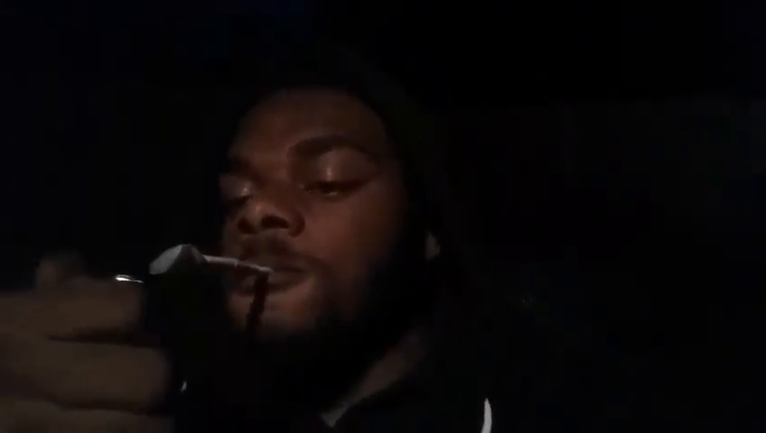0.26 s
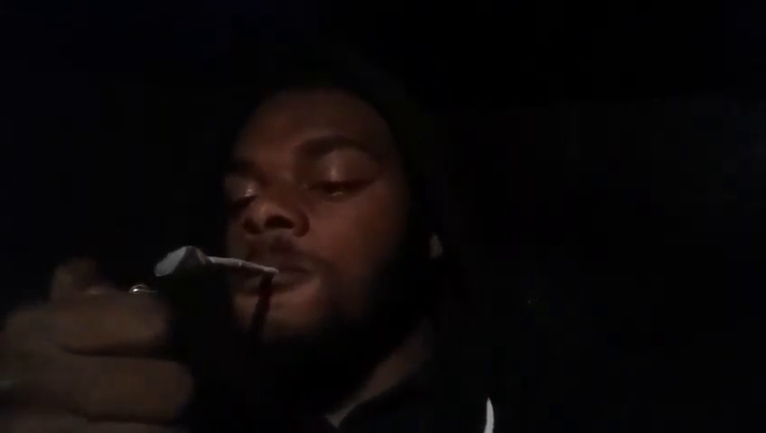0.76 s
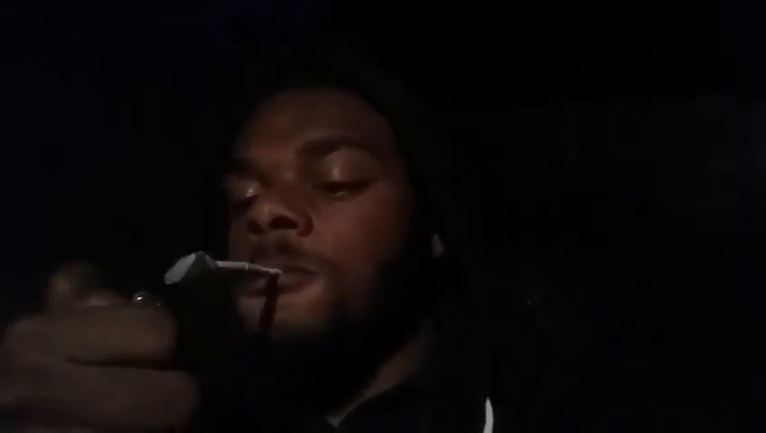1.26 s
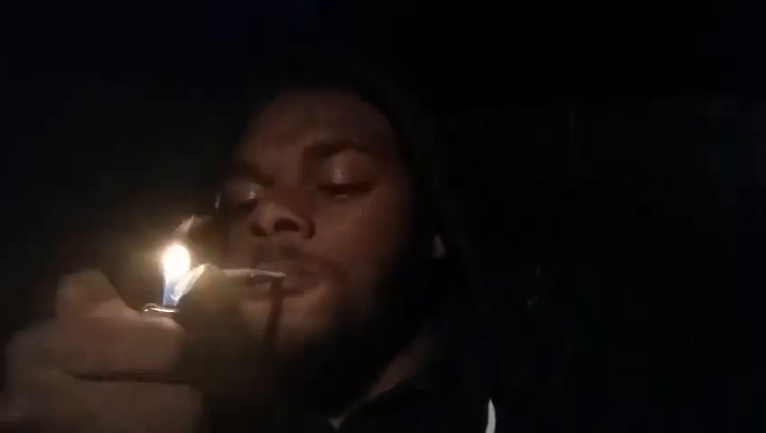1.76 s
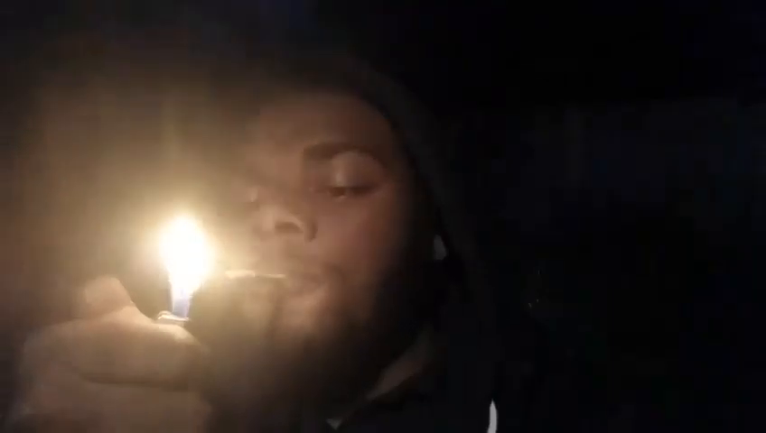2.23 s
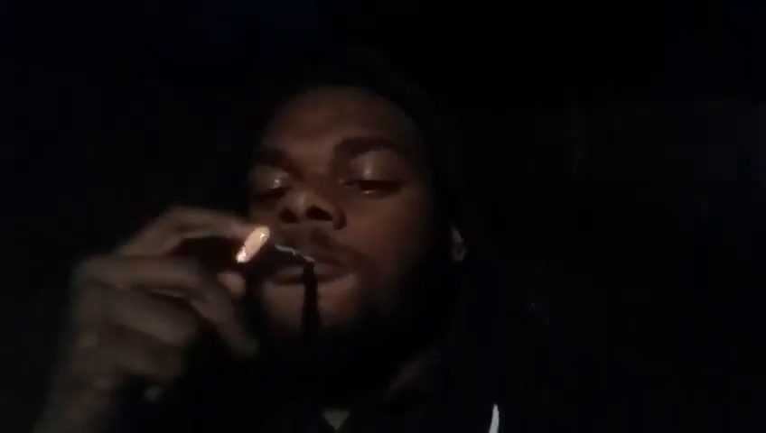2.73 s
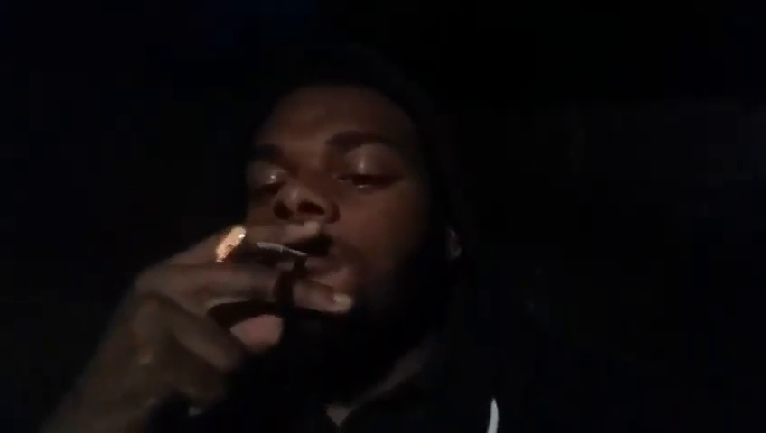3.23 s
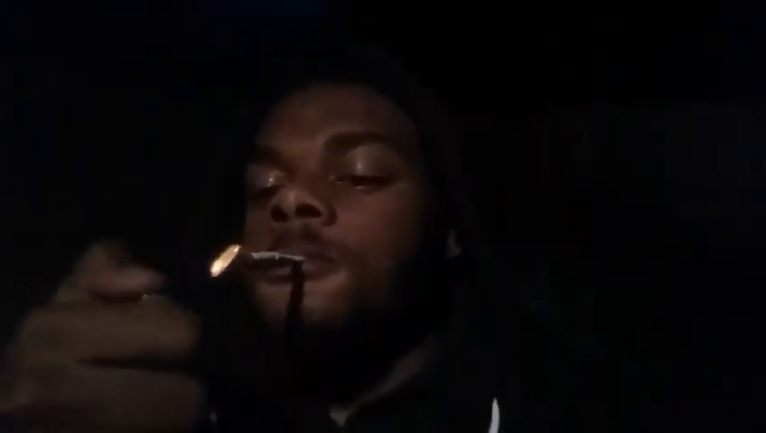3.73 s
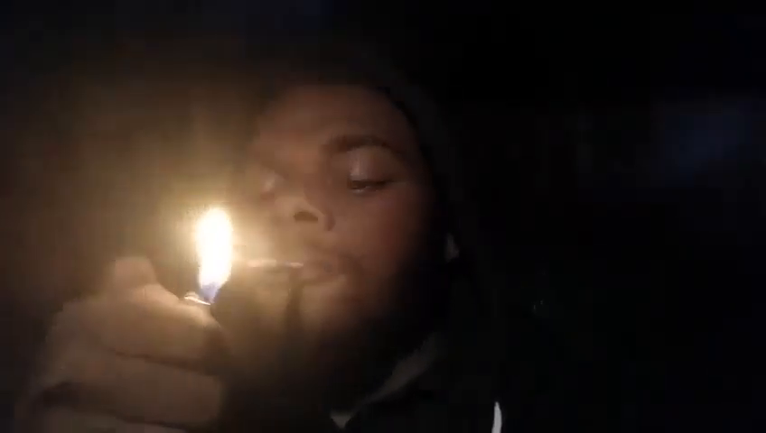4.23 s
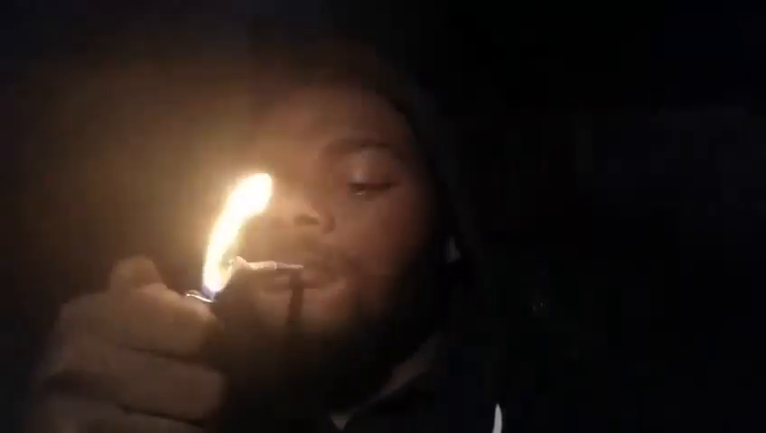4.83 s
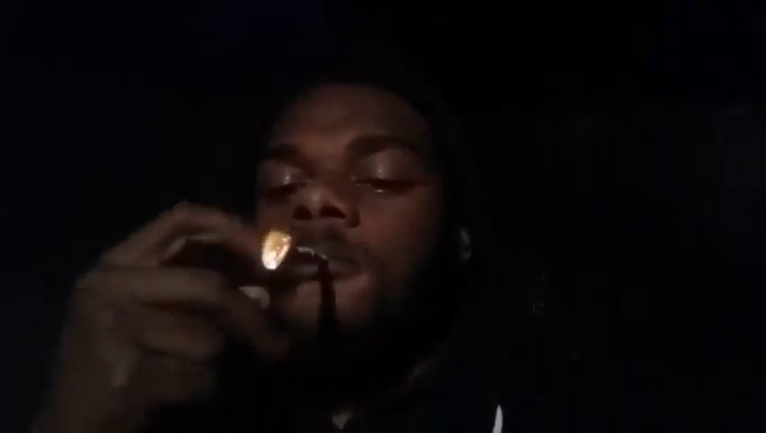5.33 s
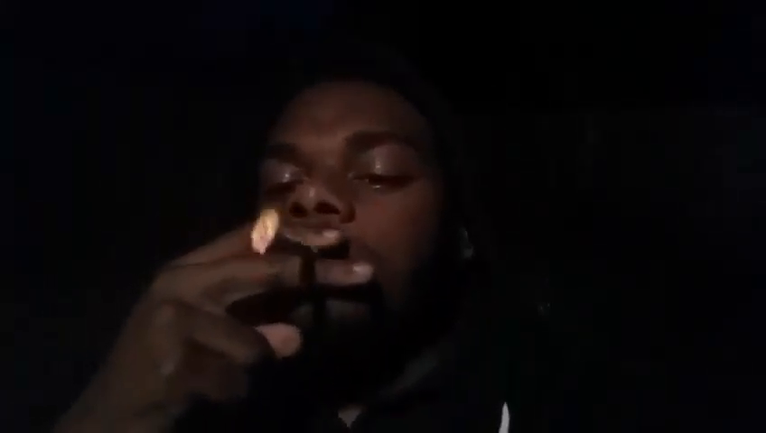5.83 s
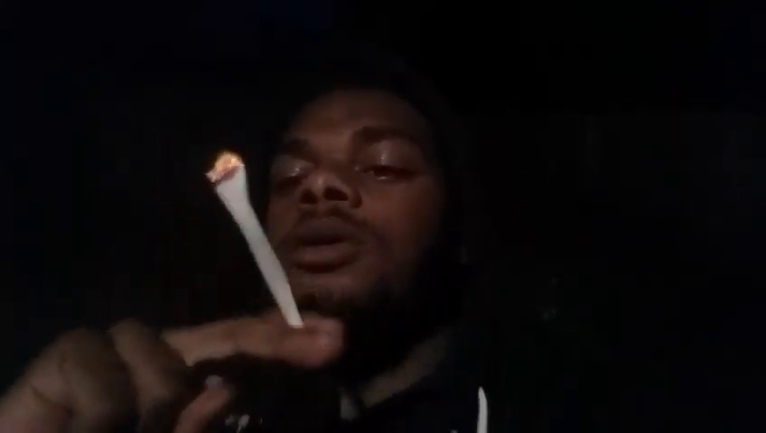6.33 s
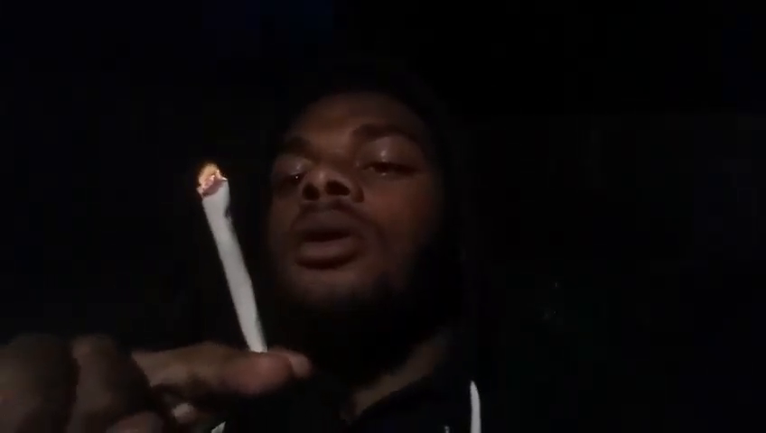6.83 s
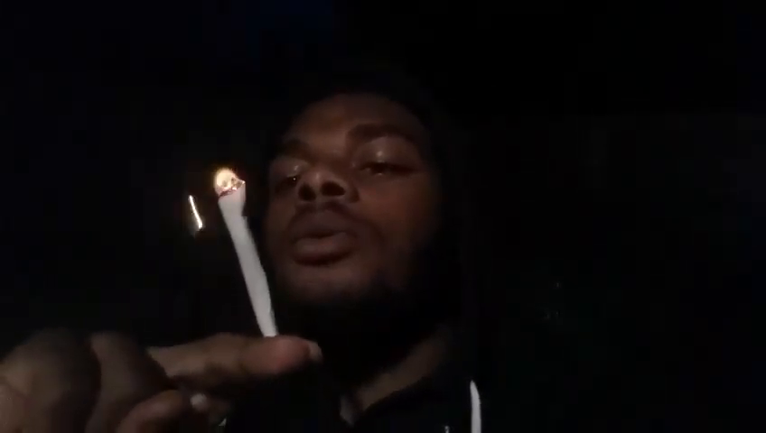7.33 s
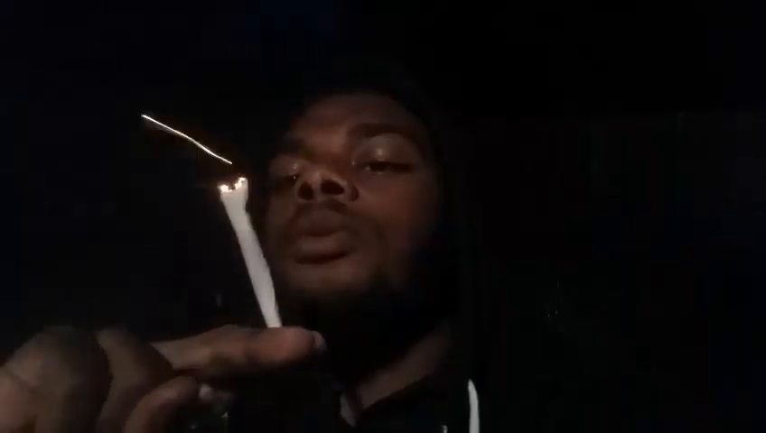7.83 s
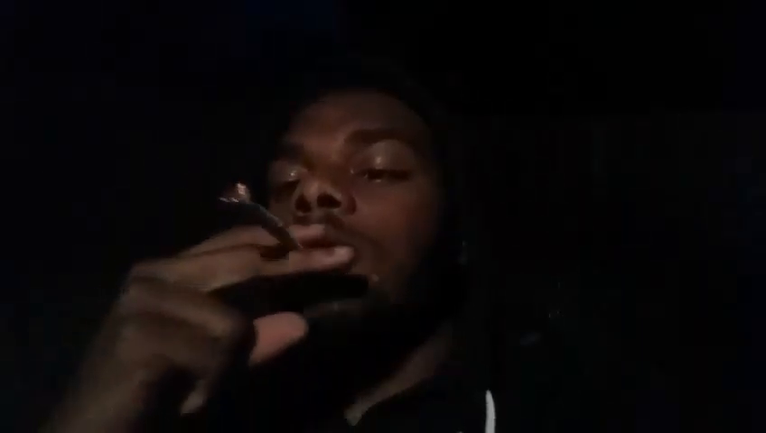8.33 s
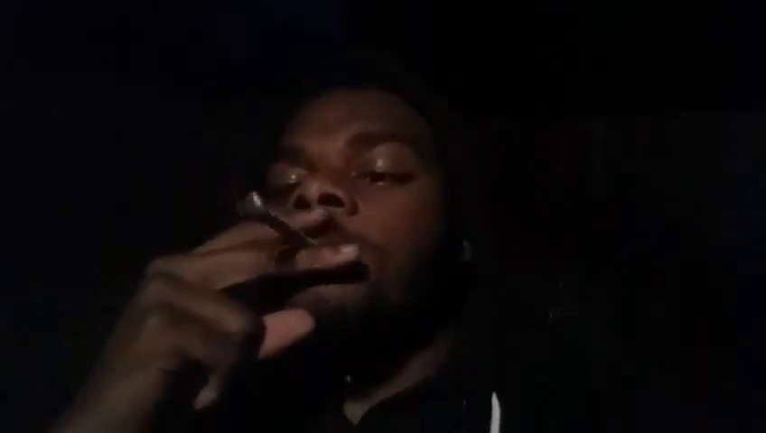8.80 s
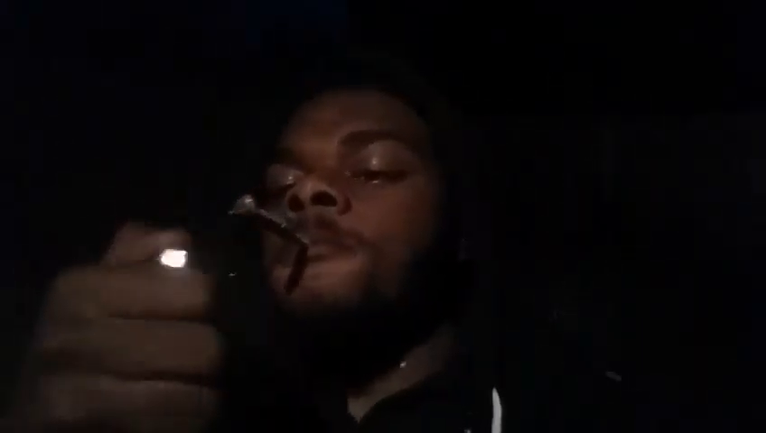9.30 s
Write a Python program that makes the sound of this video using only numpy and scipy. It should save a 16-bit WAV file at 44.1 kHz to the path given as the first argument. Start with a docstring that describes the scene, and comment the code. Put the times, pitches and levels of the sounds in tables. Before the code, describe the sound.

Outdoors, birds call in bursts with short pauses: bright high whistles and a fast trill near three seconds, rattles around four, hoarse chatter and four sharp chips at six, then mellow distant thrush notes. In the foreground a lighter wheel scratches sharply six times, with dry clicks and tiny low puffs. Quiet hiss and rumble swell and sink, squeezed by noise suppression.

```python
"""Songbirds call around a two-port microphone: a near bird rings off one wall, thrushes and far birds blur
into echoes, and a flint lighter is struck six times close by, with small ticks and puffs of flame.
The birds are gliding sines, partly scattered at random; the lighter is shaped noise with decaying thumps;
the air is patchy stereo noise that swells and sinks under drawn curves, with a faint hum.
A noise suppressor turns the sound down wherever the treble falls quiet."""
import sys
import numpy as np
from scipy import signal
from scipy.fft import rfft, irfft, next_fast_len
from scipy.io import wavfile
from scipy.ndimage import uniform_filter1d, map_coordinates

SR = 44100
rng = np.random.default_rng(int(sys.argv[2]) if len(sys.argv) > 2 else 0)


def dump_mix(stems):
    """Bounce the given channels to the path in sys.argv[1] as a 16-bit WAV at rate SR."""
    frames = np.atleast_2d(stems).T  # one column per channel
    limited = np.clip(frames, -1, 1)  # hard clip at full scale
    pcm = np.round(limited * 32767).astype(np.int16)
    wavfile.write(sys.argv[1], SR, pcm)


N = 421596


def near_bird():
    """The near bird's whole repertoire, shaded by the body between the ports and returned by one wall."""
    song = clear_notes() + falling_sweeps() + harsh_rattles() + double_voices() + stacked_notes()
    song = song + trill_notes() + chip_notes()
    return walled(placed(amp(-2.5) * song, lag=.0005), db=-2.5)


def clear_notes():
    """Whistles that scoop, hold and drop, and notes that wave in pitch; nearly pure, with a faint octave."""
    # scooped whistles: t/s, scoop/s, hold/s, from f/Hz, top f/Hz, sags to f/Hz, drops to f/Hz,
    # relative level/dB, swell/dB, sag haste (1 even, more = early)
    scoops = [(3.096, .026, 0.16, 6760, 8570, 7960, 6900, -47.5, 13, 4.4),
              (3.342, .05, 0.052, 4600, 6200, 5936, 5870, -42.5, 3.5, 0.95),
              (4.355, 0.025, 0.009, 4870, 8880, 9150, 4330, -51, 10, 0.79),
              (4.4, .026, 0.00158, 4506, 9050, 9020, 4200, -54, 9, 1),
              (4.434, 0.028, 0.083, 4514, 8130, 7410, 7370, -56.5, -2, 1.05)]
    # waving notes: t/s, length/s, middle f/Hz, opening swing/Hz, wave rate/Hz, relative level/dB, swell/dB,
    # share of a wave gone at the start
    waves = [(2.625, 0.068, 8000, 836, 24.7, -52.5, 9.5, 0.019),
             (2.626, 0.089, 6940, 419, 24.6, -50.5, -2, 0.012),
             (3.814, 0.042, 6120, 1050, 42, -47.5, 7, -.25),
             (3.887, 0.046, 6250, 1160, 41.1, -42.5, 10, -.25),
             (3.965, 0.037, 5960, 750, 42.3, -43, 4, -0.28)]
    notes = [hooked(*row, bend=2.7) for row in scoops] + waving(waves)
    return sing(notes, blur=0.052, blur_hz=170, edge=0.0016, lines=((1, 5.5), (2, -30.0)))


def falling_sweeps():
    """Short, mostly falling sweeps; the more the pitch shakes, the hoarser the note and the louder its octave."""
    # t/s, length/s, from f/Hz, to f/Hz, relative level/dB, swell/dB, pitch shake (share of pitch)
    falls = [(2.984, .016, 7600, 7200, -39.5, 2.5, 0.021), (2.758, 0.011, 7400, 6750, -50.5, -5, 0.0154),
             (5.434, 0.011, 7600, 6800, -61, -3, 0.072), (5.1, 0.0054, 7800, 5630, -49, -4, .02),
             (5.75, 0.0049, 8400, 5570, -51.5, 4, 0.011), (5.86, 0.0029, 7800, 5500, -57, 0, 0.0086),
             (5.862, 0.008, 6700, 6050, -51.5, 8, 0.027), (5.867, 0.068, 4930, 2500, -52, -5, 0.09),
             (5.885, 0.037, 7900, 5900, -62, 5, 0.005), (5.936, 0.029, 6300, 5300, -51, 4.5, 0.098),
             (5.924, 0.0425, 4000, 4650, -52.5, 12.5, 0.083), (5.966, 0.03, 7740, 6500, -60, 0, 0.01),
             (5.976, 0.034, 4200, 2800, -53, -11, 0.057), (5.997, 0.013, 6600, 5800, -52, 4, 0.053),
             (6.014, 0.0063, 7200, 6050, -44.5, 4, 0.0072), (6.024, 0.017, 6800, 5600, -41, -5, 0.097),
             (6.018, 0.054, 5000, 4250, -48.5, -10, 0.061)]
    song = np.zeros((1, N))
    for row in falls:
        shake = row[-1]
        hoarse = 7 * shake  # share of the sweep that is scattered
        lines = ((1, 5.5), (2, -40 + 25 * hoarse))
        song += sing(straight([row]), hoarse, 500, 0.00064, lines, warble=[shake], warble_hz=400)
    return song


def harsh_rattles():
    """Fast pitch shake and heavy scatter turn gliding tones into rattles, with a weak inharmonic second line."""
    # t/s, length/s, from f/Hz, to f/Hz, relative level/dB, swell/dB
    rattles = [(3.745, 0.048, 4960, 5900, -46.5, 3), (3.82, 0.082, 4540, 4920, -48, 1),
               (3.825, 0.027, 6300, 5830, -40, -3), (3.96, 0.047, 4490, 4980, -45, 5),
               (4.075, 0.024, 5160, 6410, -51.5, -5), (4.135, 0.033, 5550, 6500, -53.5, -2),
               (5.41, 0.055, 6310, 6380, -56, 5), (7.285, 0.2, 3590, 3710, -60.5, -5),
               (7.29, 0.12, 6320, 6050, -63, -9), (7.29, 0.044, 4720, 4460, -60.5, -17),
               (7.53, 0.08, 3210, 3470, -57.5, -21), (7.54, 0.067, 6100, 6000, -65, -4)]
    shake = [0.1283] * len(rattles)  # share of pitch
    return sing(straight(rattles), 0.59, 600.5, 0.005, ((1, 0), (1.45, -16)), warble=shake, warble_hz=300)


def double_voices():
    """Arched notes sung with two voices, the upper one entering slightly late."""
    # t/s, top f/Hz of the lower voice, relative level/dB, upper voice over the lower/dB
    pairs = [(.998, 6300, -37, -5), (1.068, 6200, -35, -4), (1.147, 6750, -34.5, -4),
             (1.214, 6740, -34.5, -11), (1.303, 6810, -36.5, -2.5), (1.363, 6880, -33, -7.5),
             (1.459, 6890, -37, -3), (1.525, 6670, -39, -2)]
    # one arch: t in note/s, share of top pitch, relative level/dB
    pair_shape = [(-.003, .76, -21), (.004, .93, -5), (.016, 1, 0), (.028, .95, -2), (.04, .72, -22)]
    upper_ratio, late_s = 1.155, 0.0043
    song = np.zeros((1, N))
    for s, hz, db, upper_db in pairs:
        lower = (s, 1, hz, db)
        upper = (s + late_s, 1, upper_ratio * hz, db + upper_db)
        song += sing(stretched(pair_shape, [lower, upper]), 0.15, 300, 0.0009)
    return song


def stacked_notes():
    """Climbing notes with lines above and below the main pitch, spaced by a share of that pitch."""
    # t/s, climb/s, from f/Hz, top f/Hz, drops to f/Hz, relative level/dB, line spacing (share of pitch),
    # line below against the main line/dB
    stacks = [(.247, 0.047, 4360, 5840, 4600, -35, 0.3, -14),
              (.392, 0.051, 4450, 5870, 4700, -32, 0.28, -26),
              (.562, 0.055, 4460, 5940, 4740, -33.5, 0.29, -28),
              (4.06, 0.0088, 3050, 3440, 3590, -44.5, 0.18, -0.5),
              (4.133, 0.0118, 3330, 3760, 4080, -47.5, 0.28, -1.5),
              (4.183, 0.022, 4650, 5040, 5180, -40, 0.24, -8.5),
              (4.218, 0.061, 5440, 6200, 6320, -39, 0.26, -13.5)]
    # lines above the main one: steps up, relative level/dB
    upper_lines = [(1, -13), (2, -29), (3, -33)]
    hold_s, sag_share = 0.011, 0.97
    song = np.zeros((1, N))
    for s, climb, start, top, drop, level_db, step, under_db in stacks:
        ends_high = drop > start + (top - start) / 2
        first_db = -9 * ends_high  # notes that end high have a weaker first line above
        note = hooked(s, climb, hold_s, start, top, sag_share * top, drop, level_db,
                      swell_db=1.9, haste=0.57, bend=2.3)
        lines = [(1 - step, under_db), (1, 0)]
        lines += [(1 + k * step, db + first_db * (k == 1)) for k, db in upper_lines]
        song += sing([note], 0.17, 153, 0.0016, lines)
    return song


def trill_notes():
    """A bright trill of syllables that each hold a pitch, climb and plunge."""
    # t of the drop/s, relative level/dB, opening f/Hz, top f/Hz
    trill = [(2.797, -42.5, 7800, 8600), (2.833, -39.5, 7560, 8270), (2.870, -39.5, 7530, 8340),
             (2.907, -36.5, 7440, 8300), (2.945, -36.5, 7440, 8120), (2.978, -35.5, 7320, 7900)]
    return sing(trilled(trill), 0.037, 244, 0.00085)


def chip_notes():
    """Chips: a quick clean plunge, then a scattered, shaking, falling buzz."""
    # t/s, relative level/dB
    chips = [(6.082, -32.5), (6.15, -31), (6.218, -31.5), (6.285, -32)]
    # clean plunge: t in syllable/s, nominal f/Hz, relative level/dB
    chip_drop = [(.001, 8970, -17), (.0045, 6950, -6), (.008, 5000, -12)]
    # buzz: t in syllable/s, nominal f/Hz, relative level/dB
    chip_buzz = [(.008, 6500, -3), (.02, 6200, 0), (.035, 5500, -2), (.048, 4900, -8)]
    plunge = sing(repeat(chip_drop, chips), 0.037, 244, 0.00085)
    buzz = sing(repeat(chip_buzz, chips), .6, 1000, .003, ((1, 0), (2, -36)),
                warble=[.035] * len(chips), warble_hz=400)
    return plunge + buzz


def lighter():
    """The wheel rasps ever louder on the flint until the thumb hits the lever; parts tick, the flame puffs."""
    # strikes: t of the peak/s, relative level/dB, wheel run-up/s, relative thump level/dB
    strikes = [(0.195, -20.5, 0.01, -37.5), (0.742, -21.5, 0.012, -47), (1.245, -19.5, 0.0084, -34.5),
               (1.823, -15.5, 0.006, -31), (3.929, -19, 0.008, -44.5), (9.531, -18.5, 0.007, -39)]
    # spectrum of the rasp: f/Hz, relative density/dB
    flint = [(180, -29.5), (300, -17), (747, -27), (1770, -15.5), (2120, -17), (3790, -6), (4410, -8.5),
             (4870, -8.5), (5740, -16.5), (6890, -7.5), (8700, -6.5), (15800, -19.5)]
    # stereo likeness of the rasp: f/Hz, left-right likeness
    flint_alike = [(400, .9), (1500, 0.67), (4000, .25)]
    # ticks of small parts: t/s, relative level/dB, low part against the high/dB before balancing
    ticks = [(0.0303, -33, -22), (0.1587, -38, -23), (0.2057, -32, -40), (0.2403, -50.5, -21),
             (0.541, -55.5, 4), (0.5757, -32.5, -24), (0.6801, -40.5, -10), (0.989, -44.5, -4),
             (1.0058, -40.5, -16), (1.021, -42, -20), (1.035, -43, -25), (1.1071, -36, -18.5),
             (1.608, -52, 2), (1.643, -38, -18), (1.717, -35, -17), (1.8657, -41, -11),
             (1.9044, -44, -15.5), (2.5642, -49.5, -7.5), (3.6428, -36.5, -38), (3.7416, -36, -34),
             (3.7638, -46, -15), (3.9707, -35.5, -16), (4.7872, -57, -13.5), (5.1623, -51, -3.5),
             (5.1825, -45.5, -16), (5.2059, -44, -19), (9.191, -37.5, -23), (9.2884, -42.5, -23),
             (9.396, -46, -18), (9.4484, -41.5, -17)]
    # puffs of the flame: t of the start/s, relative level/dB, f/Hz
    puffs = [(1.853, -45, 230.4), (3.947, -31.5, 199), (3.961, -47, 201), (3.9765, -40, 190),
             (4.006, -46.5, 239), (4.016, -46.5, 231), (6.465, -44.5, 445), (6.702, -47.5, 580),
             (7.96, -52.5, 79), (8.163, -54, 78.5)]
    clack_db, pan_db = -4.5, -1.5  # lever clack over the rasp; left over right
    time, t = np.arange(N) / SR, np.arange(SR // 20) / SR
    rasp, high, low, thumps = np.zeros((4, N))
    for s, db, rise, thump_db in strikes:
        gone = time - s
        run_up = np.exp(gone.clip(None, 0) / rise)
        # a fast decay over a weaker slow one
        after = amp(-60 * gone.clip(0) / 0.027) + amp(-12.0 - 60 * gone.clip(0) / 0.2)
        rasp += amp(db) * np.where(gone < 0, run_up, after)
        thump = 1.6 * amp(thump_db) * push(260, t)
        ring = np.sin(2 * np.pi * 3200 * t) * amp(-60 * t / 0.0093)
        add(thumps, s, thump + amp(db + clack_db) * (push(1300, t) + ring))
    soft = 1.65 * (1 - np.exp(-t / 0.0037)) ** 2  # rounded onset
    for s, db, low_db in ticks:
        add(high, s - .002, amp(db + 3 - 60 * t / .016) * soft)
        add(low, s - .002, amp(db + low_db - 60 * t / 0.03) * soft)
    for s, db, hz in puffs:
        bell = np.exp(-(1.9 * (hz * t - 1)) ** 2)
        add(thumps, s, 2.29 * amp(db) * np.sin(2 * np.pi * hz * t) * bell)
    teeth = amp(2.0 * wobble(700))  # the rasp is a run of grains

    def lag(hz):
        """The left port hears the noise a little later."""
        return np.exp(-2j * np.pi * hz * np.array([[.000045], [0]]))

    def treble_band(hz):
        """A smooth band between about 7 and 12 kHz."""
        return lag(hz) * (hz / 7000) ** 4 / (1 + (hz / 7000) ** 4) / (1 + (hz / 12000) ** 4)

    grit = unit(filtered(rush(flint, 0, flint_alike), lag))
    bright = unit(filtered(pair(0.43), treble_band))
    dull = unit(filtered(pair(0.96), lambda hz: (hz > 500) / (1 + (hz / 4500) ** 4)))
    sides = amp(pan_db * np.array([[.5], [-.5]]))
    return sides * (rasp * teeth * grit + amp(11.0) * high * bright + amp(13.5) * low * dull + thumps)


def push(hz, t):
    """One low swing of air: a sine with a soft onset that dies within a few cycles."""
    return np.sin(2 * np.pi * hz * t) * np.exp(-1.6 * hz * t) * (1 - np.exp(-8 * hz * t))


def far_birds():
    """Thrush, whistles and warbles; the farther the bird, the more its notes are usually scattered."""
    thrush = walled(placed(thrush_notes(), lag=-0.0002), db=-4.0)
    return thrush + placed(far_whistles(), lag=0.000566) + placed(far_warbles(), lag=0.000554)


def thrush_notes():
    """Arched thrush notes with two overtones."""
    # t/s, length/s, top f/Hz, relative level/dB
    arches = [(7.92, 0.12, 3413, -37.5), (8.081, 0.095, 3340, -38), (8.524, .12, 3360, -40.5),
              (8.695, 0.099, 3346, -38), (9.191, .115, 3426, -37.5), (9.362, 0.092, 3360, -36.5)]
    # share of length, share of top pitch, relative level/dB
    arch_shape = [(0, .79, -13), (.12, .89, -7), (.27, 0.96, -2), (.5, 1, 0), (.75, .96, 0), (.88, .89, -5),
                  (1, .78, -12)]
    lines = ((1, 2.0), (2, -19.5), (3, -37.5))
    return sing(stretched(arch_shape, arches), 0.2, 176, 0.00029, lines, size=2)


def far_whistles():
    """Bent, half-scattered whistles and long, clearer down-slurs, both shaking in pitch."""
    # t/s, length/s, from f/Hz, middle f/Hz, to f/Hz, relative level/dB, swell/dB, pitch shake (share)
    whistles = [(0, 0.077, 2600, 2650, 2600, -50.5, -23, 0.018),
                (0, 0.028, 2550, 2200, 1820, -51.5, -12.5, 0.015),
                (0.006, 0.084, 2960, 2940, 2820, -46, 4, 0.009),
                (0.029, 0.068, 1794, 1750, 1710, -61, -3, 0.015),
                (0.037, 0.062, 3480, 3430, 3100, -57.5, -3, 0.02),
                (0.433, 0.16, 2330, 2350, 2354, -61.5, 8, 0.011),
                (0.357, 0.1, 3350, 3200, 3480, -51.5, 1, 0.017),
                (0.373, 0.094, 3700, 3745, 3730, -52, -8, 0.016),
                (0.48, 0.11, 3740, 3900, 3750, -49.5, -2, 0.016),
                (0.495, 0.075, 3560, 3380, 3230, -52.5, -2, 0.015),
                (0.599, 0.095, 3740, 3625, 3520, -52.5, -2, 0.015),
                (0.598, 0.11, 3330, 3120, 2950, -56, 4, 0.015),
                (0.778, 0.1, 3504, 3595, 3600, -58.5, -19, 0.0084),
                (1.282, 0.16, 2910, 2690, 2706, -51.5, -13.5, 0.012),
                (1.468, 0.079, 1960, 1983, 1920, -55.5, 4, 0.011),
                (1.555, 0.086, 2010, 2015, 1990, -58, -8, 0.011),
                (1.401, 0.095, 2770, 2925, 3230, -50, 8, 0.021),
                (1.493, 0.12, 3090, 3316, 3460, -49.5, -4, 0.024),
                (1.475, 0.12, 3480, 3630, 3570, -53.5, 0, 0.019),
                (1.487, 0.11, 6200, 6110, 6020, -42.5, -22, 0.015),
                (1.567, 0.15, 5070, 5050, 5050, -52.5, -15.5, .008),
                (1.597, .195, 3900, 3787, 3800, -44, -9, 0.0072),
                (1.765, 0.061, 4010, 3950, 3860, -38, 6, 0.011),
                (1.844, 0.15, 3950, 3890, 3840, -56.5, -19.5, 0.012),
                (1.857, 0.35, 2730, 2710, 2720, -53.5, -18.5, 0.0025),
                (2.124, 0.2, 1700, 1826, 1810, -56, 2.5, 0.038),
                (2.457, 0.11, 3050, 3270, 3230, -51, 10, 0.017),
                (2.525, 0.091, 2720, 2760, 2666, -46.5, 12, 0.009),
                (3.628, .12, 4450, 3860, 3855, -47.5, 1, 0.015),
                (3.747, 0.17, 3820, 4010, 4620, -47, 2, 0.01),
                (7.343, 0.1, 2380, 2383, 2180, -50, -1, 0.022),
                (6.226, 0.13, 2940, 2873, 2743, -46, 10, 0.017),
                (6.439, 0.15, 2915, 3010, 2860, -49, 6, 0.023),
                (5.617, 0.22, 1930, 2230, 2300, -60.5, -6.5, 0.019),
                (7.532, 0.078, 2410, 2230, 2420, -46.5, 2, 0.022),
                (8.492, 0.051, 8000, 8200, 8120, -50, 6, 0.0055),
                (6.899, 0.14, 2306, 2320, 2300, -71, 0.5, 0.011),
                (8.6, 0.22, 1556, 1405, 1246, -65, -5, 0.011),
                (8.68, 0.1, 1910, 1930, 1870, -57.5, -4, 0.013),
                (8.588, 0.066, 2680, 2780, 2700, -48, -10, 0.033),
                (8.709, 0.059, 2780, 2760, 2700, -53, 0, 0.024)]
    # long slurs: t/s, length/s, nominal top f/Hz, relative level/dB
    slurs = [(7.62, .33, 2775, -37.5), (8.916, .35, 2770, -33.5)]
    # share of length, share of top pitch, relative level/dB
    slur_shape = [(0, 0.77, -18), (.08, 0.93, -6), (.33, 1, 2), (.6, .93, -6), (.84, .88, -1), (1, .8, -20)]
    short = sing(bent(whistles, edge_db=-0.5), 0.55, 170, 0.01, size=2,
                 warble=[row[-1] for row in whistles], warble_hz=145.7)
    long = sing(stretched(slur_shape, slurs), 0.11, 133, 0.0016, size=2,
                warble=[.003] * len(slurs), warble_hz=149.0)
    return short + long


def far_warbles():
    """Far warbles smeared by echoes: every note is fully scattered, differently at each port."""
    # t/s, length/s, from f/Hz, middle f/Hz, to f/Hz, relative level/dB, swell/dB, pitch shake (share)
    warbles = [(0.033, 0.11, 8300, 7400, 7050, -59, -15, 0.011),
               (0.924, 0.15, 7360, 7800, 7520, -55, 9, 0.041),
               (0.25, 0.121, 3390, 3630, 3560, -51, -2, 0.091),
               (1.592, 0.08, 4670, 4420, 4520, -48, -1, 0.067),
               (2.116, 0.21, 3340, 3340, 3200, -61, -8.5, 0.07),
               (2.118, .21, 2920, 2630, 2264, -55, 2, 0.072),
               (2.438, 0.098, 4270, 4420, 4580, -66, -12, 0.037),
               (2.432, 0.12, 2170, 2440, 2740, -55.5, 18, 0.063),
               (3.433, 0.11, 2640, 2625, 2540, -52.5, 3, 0.042),
               (3.454, 0.098, 3250, 3170, 3110, -53.5, -2, 0.056),
               (3.53, 0.095, 3510, 3140, 2840, -43.5, 0, 0.068),
               (4.927, 0.086, 3760, 3440, 3190, -56.5, 5.5, 0.14),
               (5.013, 0.084, 3400, 3260, 2910, -52.5, 4, 0.12),
               (5.119, 0.093, 3480, 3240, 2900, -51.5, 4, 0.15),
               (5.218, 0.081, 3460, 3510, 3430, -51.5, -3, 0.14),
               (4.938, 0.16, 2040, 2053, 2390, -61.5, -2.5, 0.095),
               (5.13, 0.17, 2100, 2295, 2500, -60.5, -2, 0.13),
               (5.411, 0.071, 3350, 3610, 3230, -52, 7, 0.15),
               (5.532, 0.067, 3800, 4430, 4280, -46.5, 0, 0.11),
               (5.639, 0.12, 2780, 3160, 4080, -43, 6, 0.093),
               (6.252, 0.104, 2550, 2580, 2505, -45.5, 4, 0.17),
               (6.46, 0.14, 2882, 2616, 2510, -43.5, 3, 0.11),
               (7.198, 0.13, 2250, 2604, 2870, -54.5, 14.5, 0.08),
               (7.321, 0.13, 1856, 2330, 2344, -48.5, 7, 0.1),
               (7.509, .115, 1693, 2160, 2540, -47, 13, 0.11),
               (7.809, 0.21, 8030, 7940, 7930, -50.5, 9.5, 0.0058),
               (8.04, 0.23, 7900, 7810, 8130, -50, -20, 0.019),
               (8.319, 0.19, 7820, 7730, 7780, -49, -8, 0.033),
               (8.552, 0.27, 8030, 8010, 7940, -49, -6.5, 0.032),
               (8.765, 0.13, 3730, 4020, 4030, -45.5, -7, 0.038),
               (8.798, 0.38, 3394, 3540, 3560, -46, -4, 0.069),
               (8.9, 0.13, 4310, 4650, 4690, -47.5, -17, 0.054),
               (8.931, 0.25, 3920, 4000, 4250, -51, -6, 0.07),
               (9.193, 0.097, 3650, 4160, 4100, -47, -17, 0.085),
               (9.247, 0.18, 4640, 4980, 4700, -48, -7, 0.072),
               (9.336, 0.152, 3870, 3860, 3800, -43.5, -4, 0.086)]
    return sing(bent(warbles, edge_db=6), 1.0, 400, 0.0071, ((1, 0.5), (2, -29.5)), size=2,
                warble=[row[-1] for row in warbles], warble_hz=500)


def grove(x):
    """Scattered echoes: a decaying noise tail in which each frequency dies at its own speed."""
    # f/Hz, time to fall 60 dB: t60/s
    decay = [(1500, 0.28), (4000, 0.34), (9000, 0.1)]
    hz, t, z = signal.stft(rng.standard_normal((2, SR // 2)), SR, nperseg=256)
    fading = z * amp(-60 * t / along(decay, hz)[:, None])
    tail = signal.istft(fading, SR, nperseg=256)[1]
    return signal.fftconvolve(x, tail / np.linalg.norm(tail[0]), axes=1)[:, :N]


def air():
    """Far rumble, murmur and hiss swell and sink; a faint far hum wavers and ends midway."""
    # spectra: f/Hz, relative density/dB
    rumble_bands = [(15, -51.5), (25, -14.5), (38, 0.5), (75, -7), (87, -6.5), (450, -15.5), (580, -35),
                    (990, -120)]
    murmur_bands = [(180, -37), (300, -10.5), (721, -1), (1850, -7), (2270, -19), (3000, -47.5),
                    (3900, -62), (6600, -120)]
    hiss_bands = [(1180, -41.5), (2000, -10.5), (2280, -12), (3190, -14), (4830, -15.5), (5600, -17.5),
                  (15800, -22)]
    # stereo width: f/Hz, left-right likeness
    air_alike = [(60, 0.7), (240, 0.82), (950, -0.19), (3770, -0.071), (15000, 0.072)]
    # rumble and murmur: t/s, relative level/dB
    low_curve = [(0.0, -57.5), (0.61, -56), (0.8, -60), (1.7, -57.5), (2.29, -63.5), (3.91, -60.5),
                 (4.37, -61.5), (4.71, -66), (6.39, -60.5), (6.79, -64), (7.16, -67.5), (7.83, -59.5),
                 (8.36, -62.5), (9.56, -63)]
    # hiss: t/s, level/dB
    hiss_curve = [(0, -54.5), (.67, -54.5), (.8, -69.5), (1.04, -54), (1.81, -55), (1.94, -62),
                  (2.53, -64.5), (2.799, -51), (3.01, -67.5), (3.3, -66), (3.78, -51.5), (4.44, -64),
                  (4.98, -68), (5.22, -59.5), (6.4, -55.5), (7.27, -70.5), (7.51, -63), (9.56, -54.5)]
    # hum: t/s, f/Hz, level/dB
    hum_curve = [(0, 562.4, -58.5), (1.2, 557.7, -63.5), (2.3, 559, -72), (4.6, 557, -67.5)]
    low, high = (amp(np.interp(np.arange(N) / SR, *np.transpose(rows))) for rows in (low_curve, hiss_curve))
    rumble = amp(0.5) * rush(rumble_bands, 0.04, air_alike)
    murmur = rush(murmur_bands, 1.66, air_alike)
    hiss = rush(hiss_bands, 1.2, air_alike)
    hum = sing([hum_curve], 0.91, 90, 0.091, size=2)
    return low * (rumble + murmur) + high * hiss + hum


def rush(spectrum, patchy_db, alike):
    """Stereo noise of rms 1 with a drawn spectrum and stereo width, in patches of random gain."""
    z = signal.stft(rng.standard_normal((2, N)), nperseg=512)[2]
    field = uniform_filter1d(uniform_filter1d(rng.standard_normal(z.shape[1:]), 5, 0), 6, 1)
    two = signal.istft(z * amp(patchy_db * unit(field)), nperseg=512)[1][:, :N]

    def mid_side(hz):
        """The angle between mid and side sets the likeness of left and right."""
        turn = np.arccos(np.clip(along(alike, hz), -1, 1)) / 2
        return amp(along(spectrum, hz)) * [np.cos(turn), np.sin(turn)]

    mid, side = filtered(two, mid_side)
    return unit(np.array([mid + side, mid - side]))


def pair(alike):
    """Stereo white noise of a given left-right likeness."""
    a, b = rng.standard_normal((2, N))
    u = np.arccos(np.clip(alike, -1, 1)) / 2
    return np.array([np.cos(u) * a + np.sin(u) * b, np.cos(u) * a - np.sin(u) * b])


def sing(notes, blur, blur_hz, edge, lines=((1, 0),), size=1, warble=None, warble_hz=150):
    """Gliding sines that may shake in pitch; a share (blur) is scattered at random, anew in each channel."""
    track = np.zeros((size, N))
    share = np.clip(blur, 0, 1)
    for rows, shake in zip(notes, warble or np.zeros(len(notes))):
        s, hz, db = np.transpose(rows)
        t = np.arange(s[0], s[-1] + edge, 1 / SR)
        glide = uniform_filter1d(np.interp(t, s, hz), max(int(2 * edge * SR), 1))
        # the shake dips from a firm top
        dips = 1 - 2.4 * np.tanh(0.84 * np.abs(wobble(warble_hz, len(t))))
        phase = 2 * np.pi * np.cumsum(glide * (1 + shake * dips)) / SR
        fade = np.clip(np.minimum(t - t[0], t[-1] - t) / edge, 0, 1)
        scatter = np.array([wobble(blur_hz, len(t)) + 1j * wobble(blur_hz, len(t)) for _ in range(size)])
        steadiness = np.sqrt(2 - 2 * share) + np.sqrt(share) * scatter
        gain = amp(np.interp(t, s, db)) * fade * steadiness
        add(track, s[0], sum(amp(g) * (gain * np.exp(1j * k * phase)).imag for k, g in lines))
    return track


def hooked(s, rise, hold, start, top, sag, drop, db, swell_db, haste, bend):
    """A note that climbs ever slower, sags while it swells, and drops; the throat favours one pitch."""
    throat_hz, throat_db_per_khz, drop_s, drop_fade_db = 5900, 3.5, 0.0099, 4
    u = np.linspace(0, 1, 9)

    def ease(a, b, power):
        """Moves from a to b, early for a high power."""
        return a + (b - a) * (1 - (1 - u) ** max(power, .1))

    hz = np.concatenate([ease(start, top, bend), ease(top, sag, haste), ease(sag, drop, 1)])
    when = s + np.concatenate([rise * u, rise + hold * u, rise + hold + drop_s * u])
    loss_db = throat_db_per_khz * (np.abs(hz - throat_hz) - abs(top - throat_hz)) / 1000
    under_db = np.concatenate([swell_db + 0 * u, swell_db * (1 - u), drop_fade_db * u])
    return np.transpose([when, hz, db - loss_db - under_db])


def waving(rows):
    """Notes whose pitch swings about a middle and calms toward the end."""
    u = np.linspace(0, 1, 30)
    calm = 1 - 0.43 * u
    notes = []
    for s, length, hz, swing, rate, db, swell_db, gone in rows:
        pitch = hz + swing * calm * np.sin(2 * np.pi * (rate * u * length + gone))
        notes.append(np.transpose([s + u * length, pitch, db + swell_db * (u - .5)]))
    return notes


def straight(rows):
    """Notes that glide evenly in pitch and level."""
    return [[(s, start, db - swell_db / 2), (s + length, end, db + swell_db / 2)]
            for s, length, start, end, db, swell_db, *_ in rows]


def bent(rows, edge_db):
    """Notes bent smoothly through start, middle and end; the ends lie edge_db under the middle."""
    u = np.linspace(-1, 1, 9)
    notes = []
    for s, length, start, mid, end, db, swell_db, _ in rows:
        pitch = mid + (end - start) / 2 * u + ((start + end) / 2 - mid) * u ** 2
        level_db = db + swell_db / 2 * u - edge_db * u ** 2
        notes.append(np.transpose([s + (u + 1) / 2 * length, pitch, level_db]))
    return notes


def stretched(shape, rows):
    """One shape at each time, length, pitch and level."""
    return [np.array(shape) * [length, hz, 1] + [s, 0, db] for s, length, hz, db in rows]


def repeat(shape, times):
    """One syllable at each time and level, its pitch a little different."""
    return [np.array(shape) * [1, 1 + 0.0061 * rng.standard_normal(), 1] + [s, 0, db] for s, db in times]


def trilled(rows):
    """Syllables that hold a pitch, climb and plunge, dipping in level early in the plunge."""
    hold_s, climb_s, drop_s, end_hz = .012, .013, .008, 6150
    return [[(s - hold_s - climb_s, low, db),
             (s - climb_s, low, db),
             (s - drop_s / 4, top, db - 1),
             (s + drop_s / 8, (top + 2 * end_hz) / 3, db - 9),
             (s + drop_s, end_hz, db - 2)] for s, db, low, top in rows]


def placed(x, lag):
    """Two ports: the left lags by lag seconds (right if negative) and the body shades it in the treble."""
    # f/Hz, left over right/dB
    shadow = [(2000, 0.5), (3300, -3.5), (4500, -4), (6500, 0.5), (7800, -14), (9000, -17.5),
              (12000, -22.5)]
    side = np.array([[.5], [-.5]])
    return filtered(x * np.ones((2, 1)),
                    lambda hz: amp(side * along(shadow, hz)) * np.exp(-2j * np.pi * hz * lag * side))


def walled(x, db):
    """A wall returns each note about 12 ms later, at slightly different times to the two ports."""
    delay = np.array([[.01195], [.01152]])
    return filtered(x, lambda hz: 1 + amp(db) * np.exp(-2j * np.pi * hz * delay))


def amp(db):
    """Decibels to linear gain."""
    return 10 ** (np.asarray(db) / 20)


def unit(x):
    """Scales to rms 1."""
    return x / np.sqrt(np.mean(x ** 2) + 1e-20)


def along(points, hz):
    """Reads (f/Hz, value) points on a log frequency axis."""
    f, v = np.transpose(points)
    return np.interp(np.log(hz + 1), np.log(f + 1), v)


def wobble(rate, size=N):
    """A smooth random curve, rate knots a second."""
    knots = rng.standard_normal(int(size * rate / SR) + 4)
    return map_coordinates(knots, [np.arange(size) * rate / SR])


def filtered(x, response):
    """x times a complex response of frequency."""
    m = next_fast_len(N + SR // 2)
    return irfft(rfft(x, m) * response(np.fft.rfftfreq(m, 1 / SR)), m)[..., :N]


def add(track, s, sound):
    """Lays a sound into a track from time s."""
    part = track[..., max(round(s * SR), 0):][..., :sound.shape[-1]]
    part += sound[..., :part.shape[-1]]


def scene():
    """Birds with their echoes, the dry lighter and the air."""
    near, far = near_bird(), far_birds()
    echoes = grove(amp(-8) * near + amp(-7) * far)
    return near + far + echoes + lighter() + air()


def record(dry):
    """A noise suppressor ducks all between treble sounds; the microphone drops deep bass and the extreme top."""
    top_hz, bass_hz = 15830, 42
    treble = filtered(dry, lambda hz: hz > 1800)
    power = uniform_filter1d(np.mean(treble ** 2, 0), int(0.016 * SR))
    level_db = 10 * np.log10(np.abs(power) + 1e-12)
    shut = 1 / (1 + np.exp((level_db + 55.5) / 4.53))  # half shut at -55.5 dB
    quiet = dry * amp(-8 * uniform_filter1d(shut, int(0.014 * SR)))
    return filtered(quiet, lambda hz: (hz < top_hz) * (hz / bass_hz) ** 3 / (1 + (hz / bass_hz) ** 3))


dry = scene()
out = record(dry)
dump_mix(out)
```